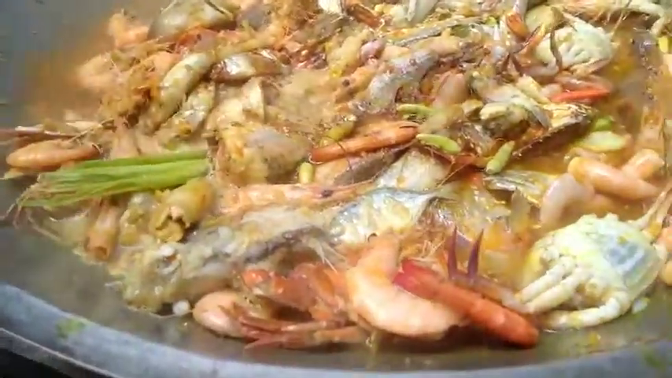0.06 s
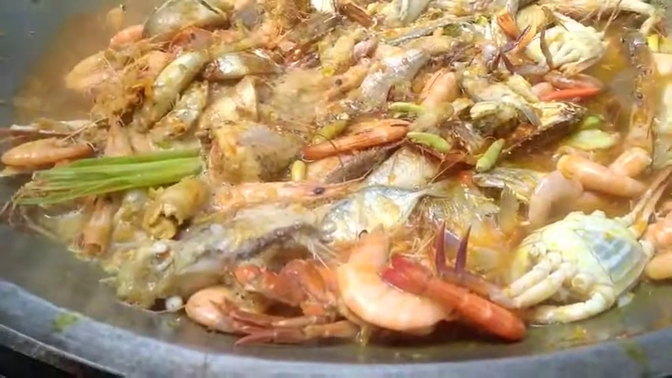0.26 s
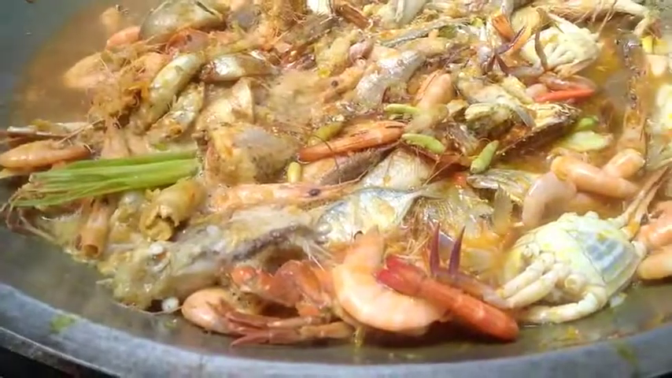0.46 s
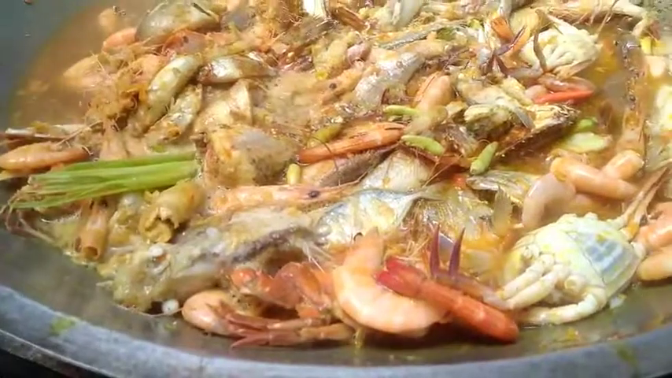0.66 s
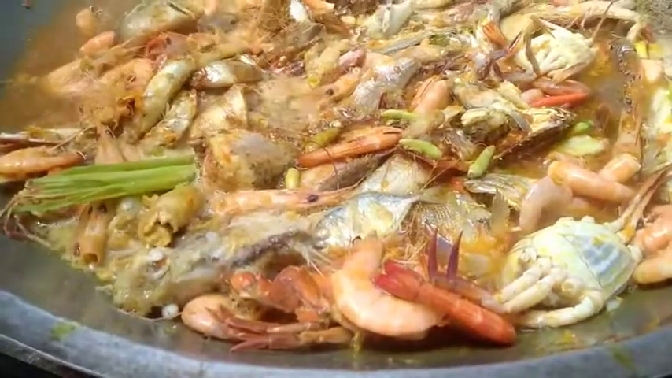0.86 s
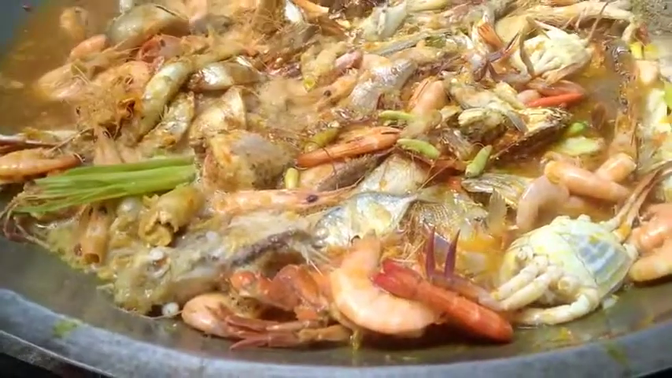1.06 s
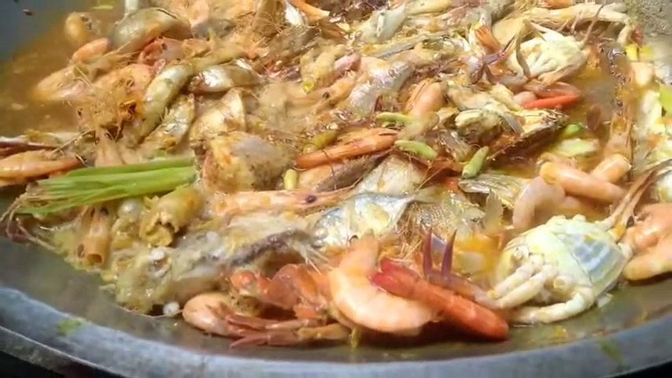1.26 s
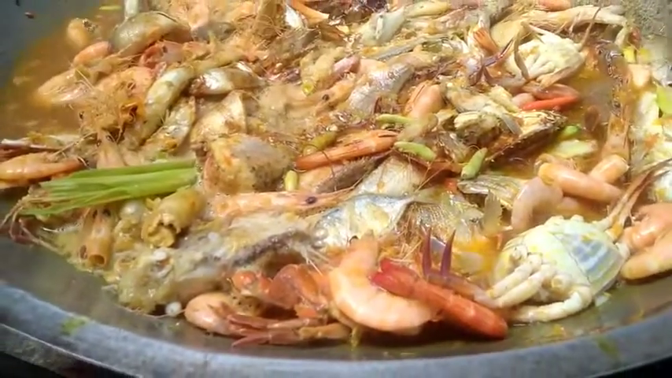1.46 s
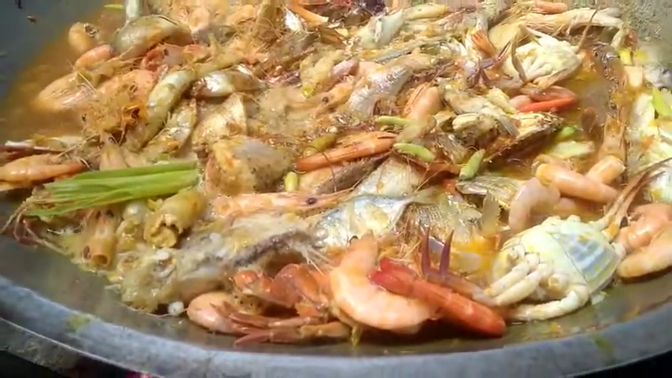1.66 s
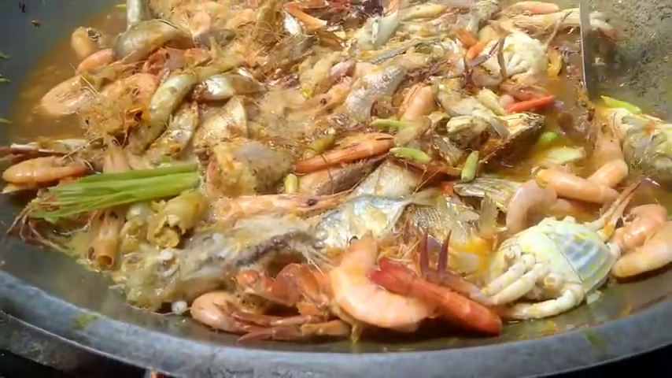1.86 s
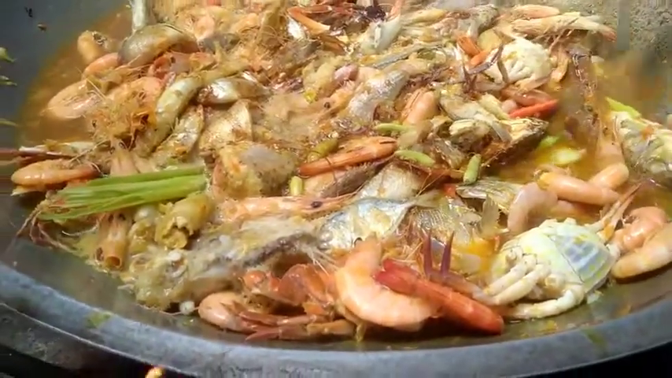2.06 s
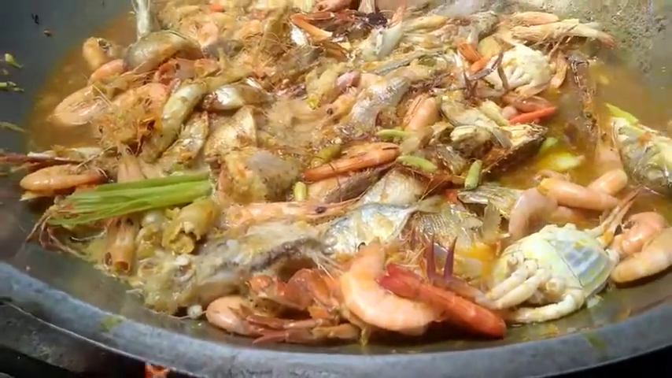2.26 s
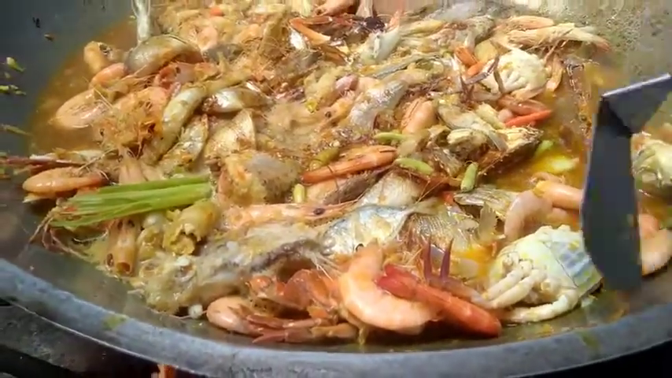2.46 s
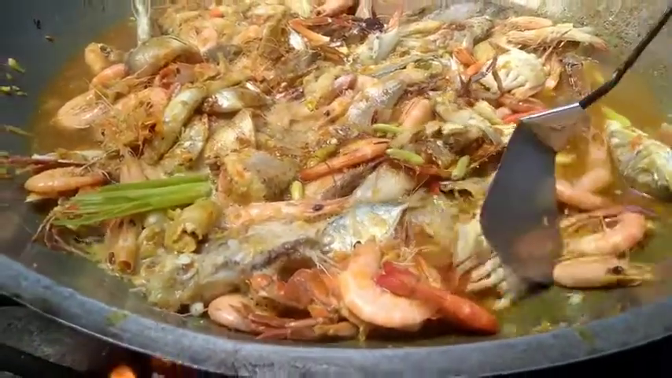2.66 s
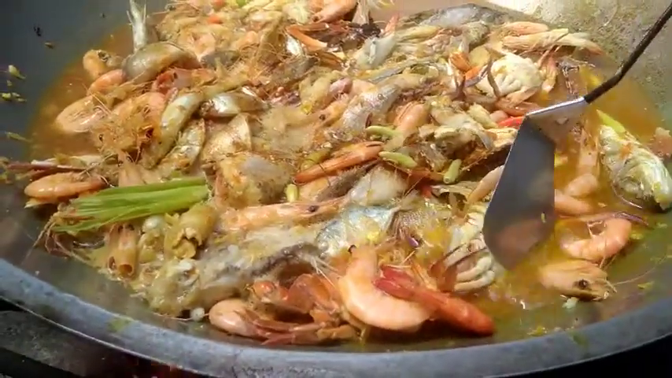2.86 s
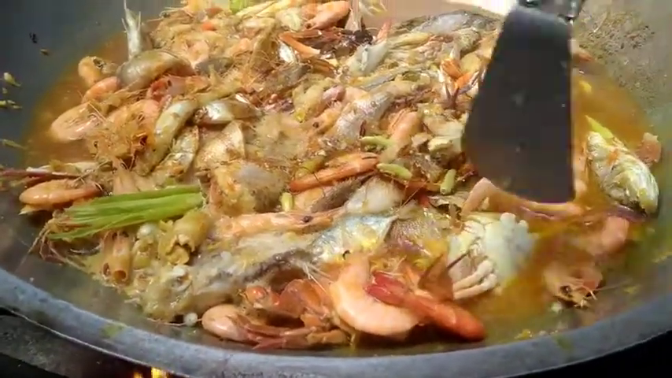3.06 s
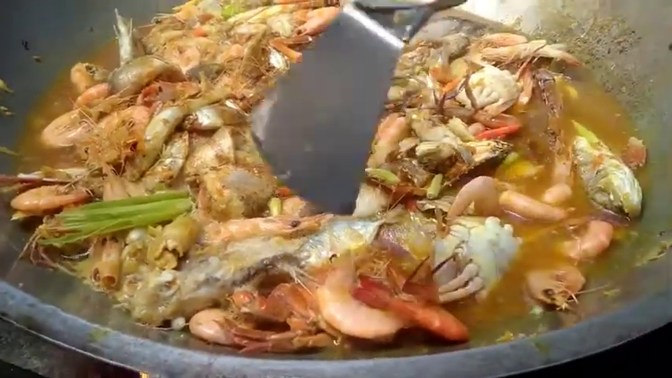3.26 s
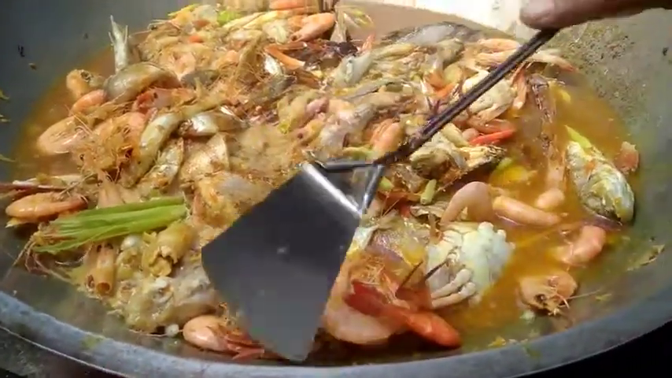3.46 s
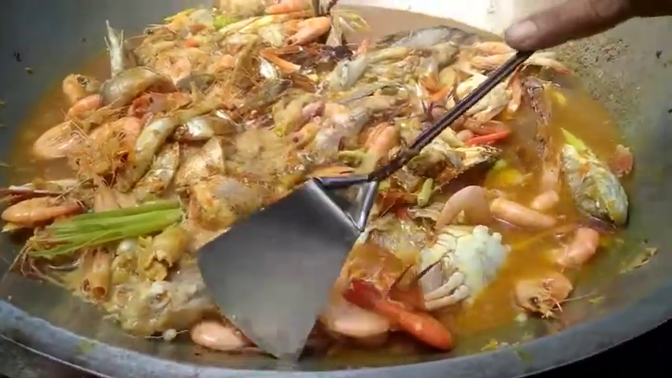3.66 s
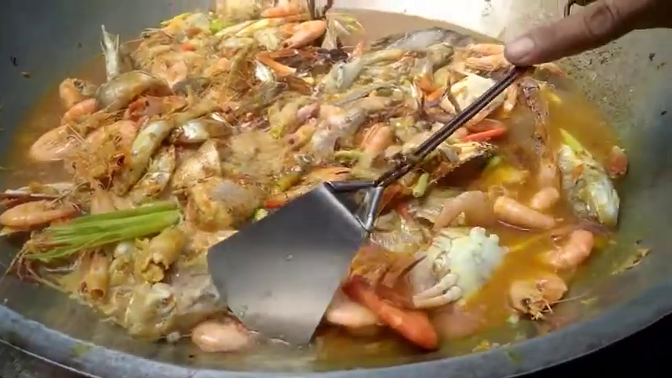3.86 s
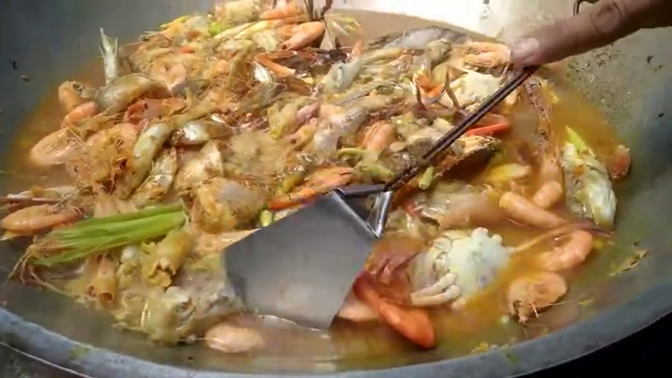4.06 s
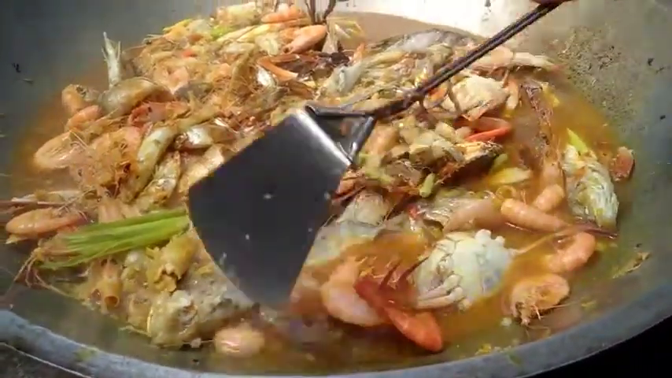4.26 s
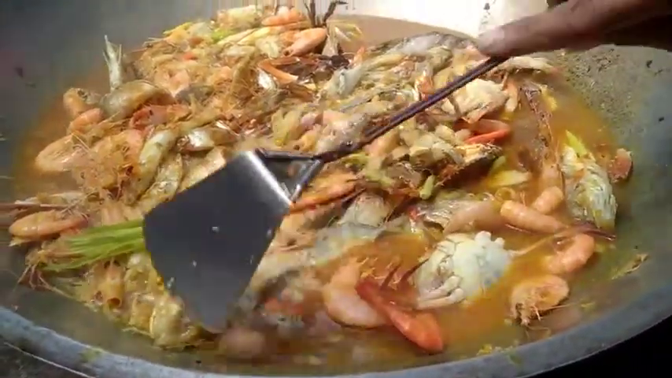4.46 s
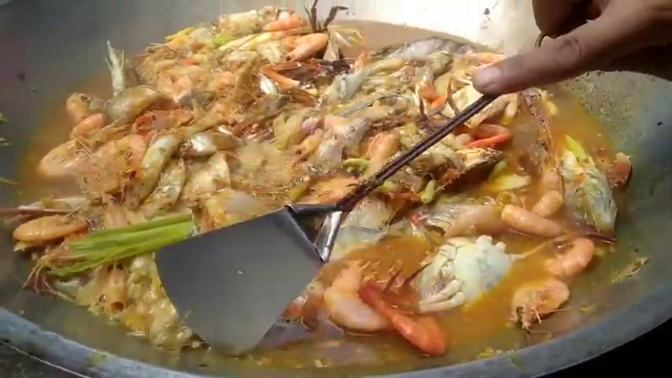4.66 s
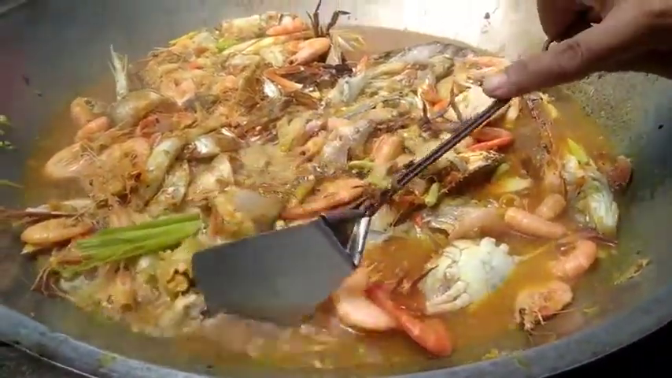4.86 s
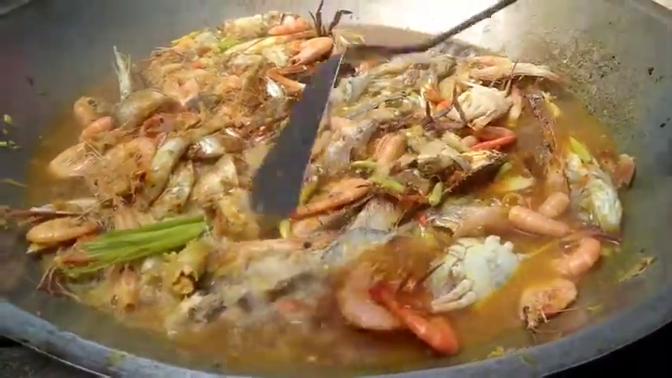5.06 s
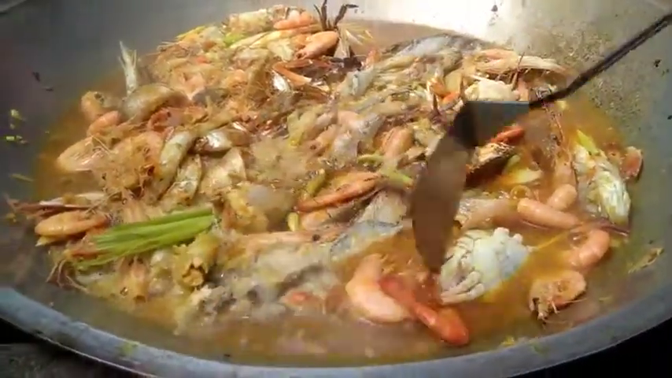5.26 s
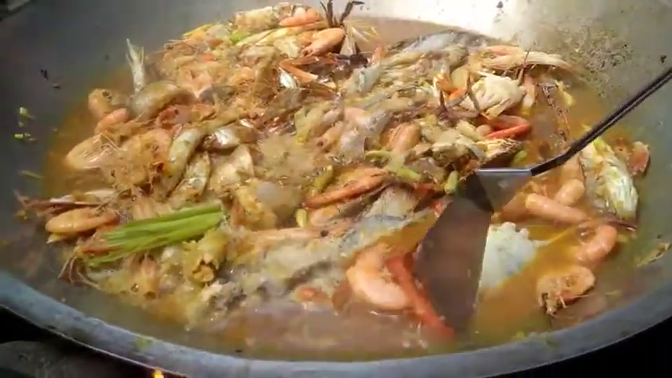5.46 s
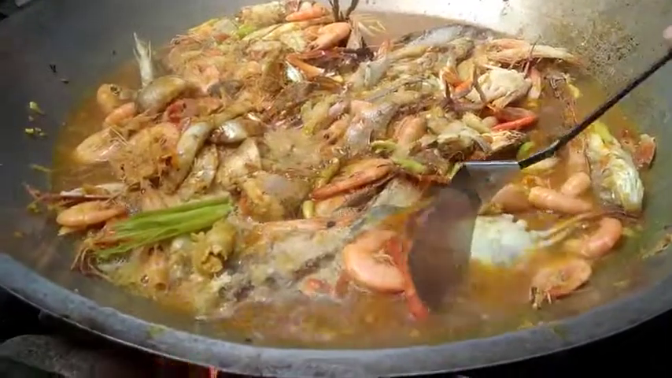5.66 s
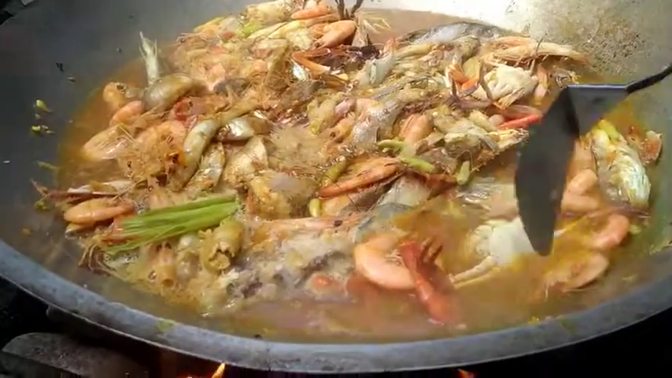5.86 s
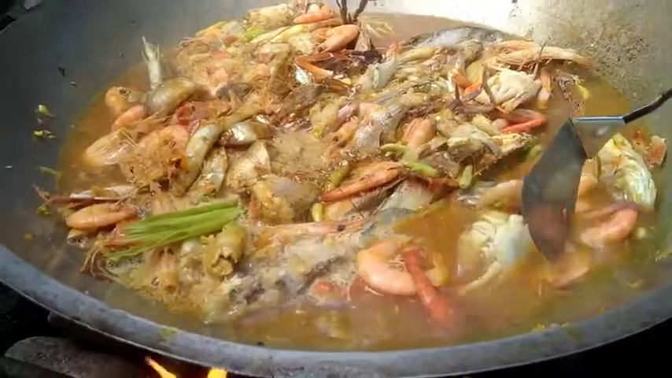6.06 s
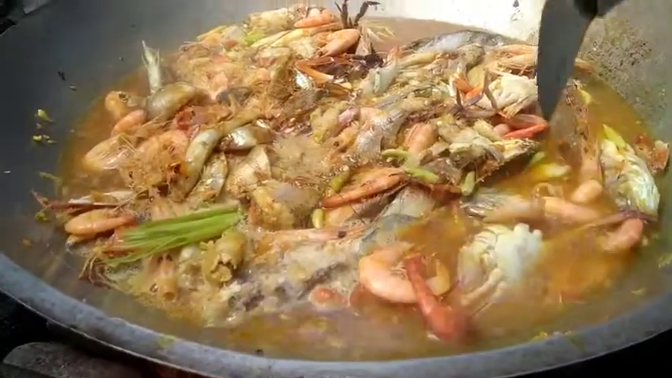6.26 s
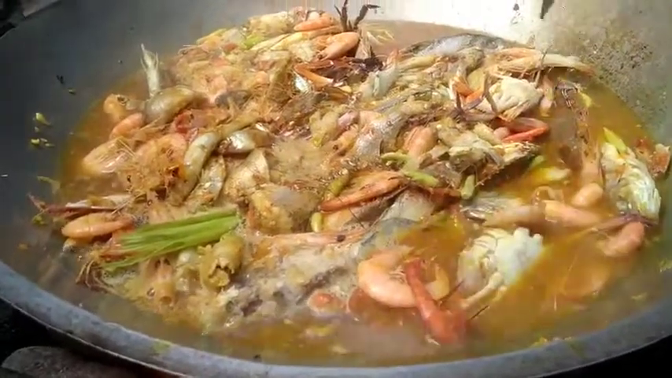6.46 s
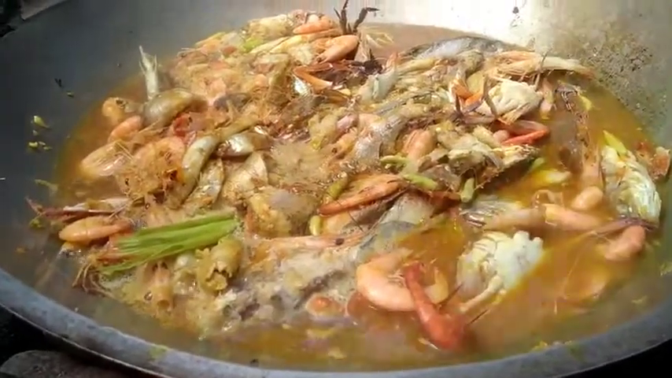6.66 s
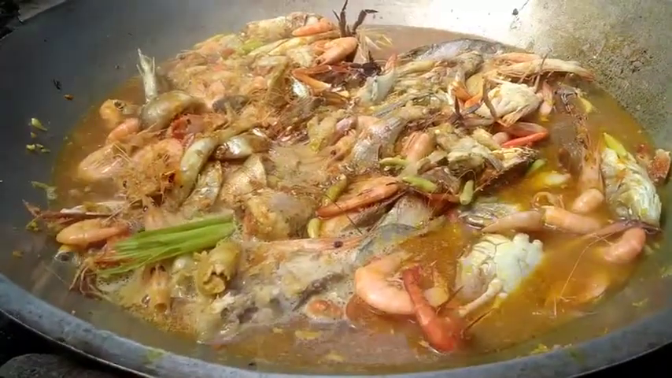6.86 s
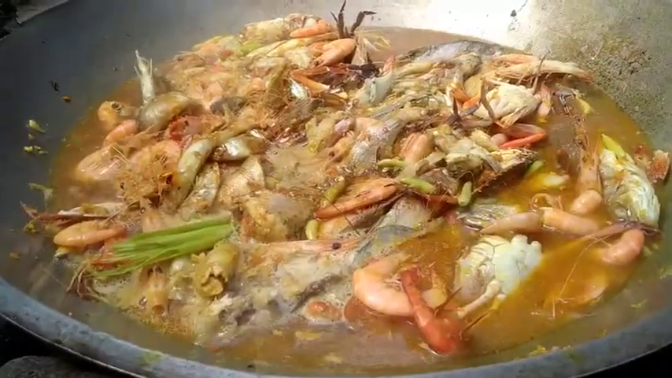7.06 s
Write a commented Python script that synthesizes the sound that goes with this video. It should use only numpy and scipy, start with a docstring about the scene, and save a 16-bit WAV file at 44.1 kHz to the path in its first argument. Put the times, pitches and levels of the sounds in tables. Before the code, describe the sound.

Close outdoor sound of a large, full steel wok over a wood fire. Soft flame rumble and faint bubbling run throughout, with occasional sharp snaps. A metal spatula knocks the rim about once a second, each clank bright but quickly damped. Between knocks it scrapes grittily along the wall and pushes broth, with wet gurgles, low booms and short steam hisses. The last second is mostly simmering.

```python
"""Seafood wok over a wood fire

A large steel wok simmers outdoors: noise-built flames rumble and hiss, random clicks bubble and spit.
A metal spatula knocks the wok (filtered clicks, short noise modes and ringing lines), scrapes along its
wall (streams of tiny slips) and pushes through the broth (bubble clusters, booms and bursts of steam).
The full wok damps each clank quickly but hums on in its lowest modes, as slowly wavering sines."""
import sys
import numpy as np
from scipy import signal
from scipy.fft import rfft, irfft, next_fast_len
from scipy.io import wavfile

SR = 44100
rng = np.random.default_rng(int(sys.argv[2]) if len(sys.argv) > 2 else 0)


def persist_wave(psi):
    """Save psi, clipped to +-1, as 16-bit WAV."""
    counts = np.round(np.clip(psi, -1, 1) * 32767).astype(np.int16)
    wavfile.write(sys.argv[1], SR, np.atleast_2d(counts).T)


N = 313551
TIME = np.arange(N) / SR
# All levels below are relative: each layer sets its own trim.

# rumble of the flames: start_s, level_db
FLAMES = [(0, -49.5), (1.3, -49), (3.3, -42.5), (3.85, -40), (4.3, -44), (6.1, -43), (6.55, -46.5),
          (7.11, -45)]
# vigour of the simmer: start_s, level_db
VIGOUR = [(0, -65.5), (0.5, -70.5), (1.3, -72.5), (3.4, -71.5), (4.5, -65), (5.3, -63.5), (6.1, -64.5),
          (7.11, -64.5)]
# spectra of the flames, the bubbling, the bright spitting and the scraped grit: pitch_hz, level_db
FIRE_SPECTRUM = [(40, -42.5), (52, -14.5), (66, -11), (85, 0.5), (130, 3.5), (200, 0.5), (270, -7),
                 (380, -18.5), (600, -23), (4000, -74)]
SIMMER_SPECTRUM = [(300, 7), (500, 1), (900, -3), (1400, -1), (2000, -3), (2700, -13), (3600, -14),
                   (7000, -62.5)]
SIZZLE_SPECTRUM = [(2500, -18), (4500, -4.5), (5900, -3), (7200, -1.5), (8700, 6.5), (11000, 1), (14000, 3),
                   (16000, 2.5)]
GRIT_SPECTRUM = [(1200, -72), (2500, 7), (3600, 7), (4300, -2.5), (5000, 0.5), (5900, -10), (7300, -2),
                 (8700, -2), (10500, -12), (16000, -16.5)]

# the wok's low hum, kept going by the stirring: start_s, level_db
HUM_LEVEL = [(0.0, -57), (0.34, -61.5), (1.9, -56), (2.06, -51.5), (2.89, -49.5), (3.13, -55), (3.7, -41.5),
             (4.73, -42), (5.31, -50), (5.8, -39), (6.63, -58.5), (7.11, -47)]
# the loaded wok's lowest modes: pitch_hz, level_db
HUM_MODES = [(116, 2), (158, -16), (194, -13.5), (234, -13)]

# loud snaps of fire and spitting broth: start_s, level_db, body_against_crack_db
SNAPS = [(0.084, -32.5, -33), (0.3047, -31.5, -4.5), (1.661, -42, -21), (4.272, -38, 4.5),
         (5.333, -39.5, 1.5), (6.3722, -32, 5), (6.7191, -40, 1)]

# broth pushed up onto the hot wall flashes to steam: start_s, level_db, swell_s
FIZZES = [(0.790, -56.5, 0.11), (1.9, -47.5, 0.03), (3.485, -42.5, 0.035), (3.719, -42, 0.032),
          (4.294, -40, 0.067), (4.760, -50, 0.038), (5.041, -51.5, 0.032), (5.344, -49, 0.016)]
FIZZ_T60_PER_SWELL = 3.6

# broth shoved by the blade: start_s, pitch_hz, level_db, swell_s
SLOSHES = [(0.174, 482, -42.5, 0.0057), (0.990, 620, -39.5, 0.0053), (1.873, 389, -34, 0.025),
           (2.416, 825, -46, 0.003), (2.939, 389, -39.5, 0.021), (4.430, 444, -45, 0.028),
           (5.126, 323, -30.5, 0.0069), (5.341, 398, -35.5, 0.0035), (6.915, 374, -44, 0.016)]
SLOSH_T60_S, SLOSH_T60_PER_SWELL = 0.07, 9   # slow shoves gurgle for longer
# smaller bubbles are weaker, the more so after a slow swell
SPLASH_DB_PER_OCTAVE, SPLASH_LOSS_DB_PER_S = -5.5, 250
# shoves that make the loaded wok boom: start_s, pitch_hz, level_db
BOOMS = [(1.9, 178.2, -33.5), (2.946, 144.4, -23), (3.451, 195.8, -31.5), (3.707, 118.6, -23.5),
         (4.79, 115.7, -30), (5.691, 136, -27), (5.72, 100, -31.5)]
BOOM_SWELL_S, BOOM_T60_S = 0.035, 0.38

# long drags down the wall, one curve each, as pressure on the edge: time_s, pressure_db
DRAGS = [
    [(0.65, -50), (0.812, -56), (0.82, -50), (0.894, -51), (0.908, -56), (1.014, -51), (1.034, -53.5),
     (1.094, -52.5), (1.14, -76)],
    [(1.79, -59), (1.804, -69), (1.812, -40), (1.838, -41.5), (1.932, -38.5), (2.022, -54), (2.048, -67),
     (2.06, -67)],
    [(2.62, -30.5), (2.64, -37), (2.67, -34), (2.682, -31), (2.718, -38.5), (2.746, -28), (2.784, -31),
     (2.806, -52), (2.86, -54.5)],
    [(3.68, -48), (3.724, -44.5), (3.758, -32.5), (3.838, -64), (3.914, -46), (3.988, -61), (4.17, -58),
     (4.25, -84)],
    [(4.742, -27), (4.752, -44), (4.866, -38.5), (4.886, -55), (4.908, -41.5), (4.942, -55), (5.038, -62),
     (5.06, -53), (5.1, -51)],
]
# where each drag begins: wall_hz, wall_against_blade_db, grit_db
DRAG_WALLS = [(1077, -1.5, -0.5), (1040, -5, 0), (1124, -2.5, 1.5), (880, -0.5, 1), (853, -7.5, 0)]
# deeper in the broth the wall sounds lower and outweighs the blade, and the broth smothers the grit
SINK_S, SINK_OCTAVES, SINK_WALL_DB, SINK_GRIT_DB = 0.25, 0.28, 6.5, -2.5
# quick swipes of the edge: peak_s, length_s, pressure_db, wall_hz, wall_against_blade_db
SWIPES = [(0.192, 0.097, -42, 1090, 0.5), (2.146, 0.056, -62, 1210, 12), (2.347, 0.13, -58, 1437, 0.5),
          (3.511, 0.094, -42.5, 1530, -1.5), (4.355, 0.17, -37.5, 1400, -1.5), (5.595, 0.25, -56.5, 830, 4),
          (6.26, 0.058, -66.5, 1142, 16)]
SWIPE_ATTACK = 0.42   # share of a swipe spent pressing in
# harder pressure throws more grit: level at a firm push, and its growth in dB per dB
FIRM_DB, GRIT_DB, GRIT_GROWTH = -39, -3, 0.073
BLADE_HZ = 1788   # where the blade rings when rubbed

# spatula on wok: start_s, clank_db, favoured_hz, lift_there_db, weight_behind_it_db,
# clank_t60_s (shorter in the treble), wok_ring_db, belly_hz, rebound_after_s (0 for none)
BLOWS = [(0.4699, -24, 2400, 2.5, -4.5, 0.093, -17, 400, 0.00072),
         (0.585, -26.5, 1150, 4, -7, 0.093, -20.5, 393, 0.0043),
         (1.7225, -26, 3500, 10, 1, 0.013, -25.5, 392, 0),
         (2.5852, -24.5, 1460, 3, 2.5, 0.11, -17, 378.6, 0.014),
         (3.6206, -24, 1780, 8, 2.5, 0.052, -19.5, 159, 0.0077),
         (4.6836, -22, 1760, 7, 4, 0.029, -24.5, 229.3, 0.006),
         (5.531, -24, 1940, -3.5, -5.5, 0.18, -25, 238.9, 0),
         (5.7017, -28, 1800, 14.5, -24, 0.014, -36, 134, 0.0137)]
# the rebound is weaker and leaves the wall free to ring
REBOUND_DB, REBOUND_RING_DB, REBOUND_T60_S = -8, -1, 0.16
# force of a contact: pitch_hz, level_db
CONTACT_SPECTRUM = [(400, -8.5), (1000, 1.5), (3500, -0.5), (9000, -8)]
# the clank's crowd of short modes: pitch_hz, level_db
CLANK_SPECTRUM = [(250, -8.5), (400, -3), (580, -12), (800, -4), (1150, -6), (1500, -2), (1900, 3.5),
                  (2300, -13), (2800, -5), (3500, -9), (4300, -8), (5900, -12.5), (7900, 1), (15500, -12)]
# modes of the wok wall: pitch_hz, level_db, t60_s (before the food damps it)
WOK_MODES = [(258, -10.5, 0.31), (387.7, -10, 0.25), (822, -2, 0.18), (942, 1.5, 0.037), (1102, -0.5, 0.15),
             (1316, -7, 0.24), (1364, -31, 0.18), (1465, -6.5, .14), (1673, -0.5, 0.1), (1828, -11.5, 0.12),
             (1988, -2, 0.091), (2100, -1, 0.11), (2238, 5.5, 0.069), (2238, -4, 0.17), (2540, -8.5, 0.14),
             (2966, -7, 0.12), (3176, -4, 0.051), (3474, -12, 0.085), (3620, -0.5, 0.024),
             (6800, -19.5, .04), (7400, -5.5, 0.042)]
WEIGHT_HZ = 750   # the weight behind a blow is heard below this
LIFT_REACH_OCTAVES = 0.92   # width of the favoured region
# a heavy blow also wakes a low belly mode, which falls 60 dB in a set number of cycles
BELLY_DB, BELLY_CYCLES = -12.5, 180
# and the blade's high note
PING_HZ, PING_DB, PING_T60_S = 8570, -23, 0.14

CUTOFF_HZ = 15700


def from_db(db):
    """Decibels to amplitude."""
    return 10 ** (np.asarray(db) / 20)


def rms_one(x):
    """Scale a sound to an rms of 1."""
    return x / np.sqrt(np.mean(x ** 2) + 1e-20)


def in_time(rows):
    """A level curve read at every sample."""
    s, db = np.transpose(rows)
    return np.interp(TIME, s, db)


def at_hz(points, hz):
    """A spectrum read on a log-frequency axis."""
    f, db = np.transpose(points)
    return np.interp(np.log(np.maximum(hz, 1)), np.log(f), db)


def add(out, s, sound):
    """Mix a sound in from time s on."""
    i = max(0, round(s * SR))
    out[i:i + len(sound)] += sound[:N - i]


def coloured(x, spectrum):
    """Give a steady excitation a spectrum that falls away below its first point; rms 1."""
    size = next_fast_len(len(x))
    hz = np.arange(size // 2 + 1) * SR / size
    bass_fall = np.minimum(hz / spectrum[0][0], 1) ** 2
    gain = from_db(at_hz(spectrum, hz)) * bass_fall
    return rms_one(irfft(rfft(x, size) * gain, size)[:len(x)])


def band(x, hz, octaves, order=2):
    """A broad resonance, its edges held below the top of the range."""
    edges = hz * 2. ** (np.array([-.5, .5]) * octaves)
    edges = np.minimum(edges, [SR * .4, SR * .45])
    return signal.sosfilt(signal.butter(order, edges, "band", fs=SR, output="sos"), x + 1e-18)


def resonance(x, hz, octaves):
    """A rounded peak with steep skirts; rms 1."""
    peak = band(x, hz, octaves, order=1)
    return rms_one(band(peak, hz, 2 * octaves, order=1))


def drift(rate, size):
    """Slow random wander through knots of spread 1, at a rate in knots per second."""
    knots = rng.standard_normal(int(size / SR * rate) + 2)
    return np.interp(np.arange(size) / SR * rate, np.arange(len(knots)), knots)


def fade(t, t60):
    """Free decay, down 60 dB after t60 seconds."""
    return np.exp(-np.log(1000) * t / t60)


def swell(t, rise, t60):
    """A smooth rise, then free decay."""
    return np.sin(np.pi / 2 * np.minimum(t / rise, 1)) ** 2 * fade(np.maximum(t - rise, 0), t60)


def grains(size, per_s, spread_db):
    """Random clicks of uneven size and sign."""
    sizes = from_db(spread_db * np.minimum(rng.exponential(1, size), 4))
    return (rng.random(size) < per_s / SR) * sizes * rng.choice([-1, 1], size)


def yard(x, wet_db=-20, t60=0.18):
    """Weak scatter from the ground and the walls near by: a short swell of decaying noise."""
    t = TIME[:SR // 2]
    scatter = band(rng.standard_normal(len(t)), 1540, 6.7, order=1) * swell(t, 0.013, t60)
    scatter = scatter / np.linalg.norm(scatter)
    return x + from_db(wet_db) * signal.fftconvolve(x, scatter)[:N]


def hearth(fire_db=1, simmer_db=9, sizzle_db=-2, crackle_db=-2, simmer_follows=0.89):
    """Flames rumble on their own curve while the broth bubbles, hisses and spits with its vigour."""
    rumble_db = in_time(FLAMES) + fire_db + drift(9.4, N)
    flames = from_db(rumble_db) * coloured(rng.standard_normal(N), FIRE_SPECTRUM)
    vigour = in_time(VIGOUR)
    # the bubbling follows the vigour a little less than fully
    bubbling = vigour.mean() + simmer_follows * (vigour - vigour.mean())
    bubbling_db = bubbling + simmer_db + 4.66 * drift(25, N)
    bubbles = from_db(bubbling_db) * coloured(grains(N, per_s=5000, spread_db=3.0), SIMMER_SPECTRUM)
    hiss = from_db(sizzle_db) * coloured(rng.standard_normal(N), SIZZLE_SPECTRUM)
    # tiny spits ring at ten different pitches
    pops = np.zeros(N)
    for hz in np.geomspace(3000, 15000, 10):
        pops += band(grains(N, per_s=69, spread_db=2.5), hz, 0.65, order=1) / np.sqrt(hz)
    spits = from_db(crackle_db) * coloured(pops, SIZZLE_SPECTRUM)
    return flames + bubbles + from_db(vigour) * (hiss + spits)


def hum(waver_db=3.0, waver_hz=2.517, waver_per_s=11):
    """Flames and stirring keep the low modes sounding, each wavering a little in level and pitch."""
    lines = np.zeros(N)
    for hz, db in HUM_MODES:
        phase = 2 * np.pi * np.cumsum(hz + waver_hz * drift(waver_per_s, N)) / SR
        level = from_db(db + waver_db * drift(waver_per_s, N))
        lines += np.sqrt(2) * np.sin(phase) * level
    return from_db(in_time(HUM_LEVEL)) * lines


def snaps(crack_t60=0.038, body_t60=0.037):
    """A bright crack with a short woody body, both bursts of decaying noise."""
    out, t = np.zeros(N), TIME[:SR // 8]
    for s, db, body_db in SNAPS:
        crack = coloured(rng.standard_normal(len(t)), SIZZLE_SPECTRUM) * fade(t, crack_t60)
        body = rms_one(band(rng.standard_normal(len(t)), 1090, 2.26)) * fade(t, body_t60)
        add(out, s, 0.42 * from_db(db) * (crack + from_db(body_db) * body))
    return out


def fizzes(crackle_per_s=6000):
    """Broth flashing to steam: bursts of tiny pops that swell and die away."""
    out, t = np.zeros(N), TIME[:SR]
    for s, db, rise in FIZZES:
        pops = coloured(grains(len(t), crackle_per_s, spread_db=3), SIZZLE_SPECTRUM)
        add(out, s, from_db(db) * pops * swell(t, rise, FIZZ_T60_PER_SWELL * rise))
    return out


def broth(octave_seconds=0.08):
    """Pushed food lets out clusters of bubbles, narrower the longer they ring; the heavy wok booms."""
    out, t = np.zeros(N), TIME[:SR]
    for s, hz, db, rise in SLOSHES:
        t60 = SLOSH_T60_S + SLOSH_T60_PER_SWELL * rise
        for octave in range(3):
            bubbles = grains(len(t), per_s=1100, spread_db=3.0)
            cluster = resonance(bubbles, hz * 2 ** octave, octave_seconds / t60)
            smaller_db = octave * (SPLASH_DB_PER_OCTAVE - SPLASH_LOSS_DB_PER_S * rise)
            add(out, s, from_db(db + smaller_db) * cluster * swell(t, rise, t60))
    for s, hz, db in BOOMS:
        add(out, s, from_db(db) * np.sin(2 * np.pi * hz * t) * swell(t, BOOM_SWELL_S, BOOM_T60_S))
    return out


def wok_ring(force, favoured_hz, focus_db=7, reach_octaves=0.21, damping=1.13):
    """The wall's modes; each contact point favours one region of them, and the food damps them all."""
    out = np.zeros(len(force))
    for hz, db, t60 in WOK_MODES:
        r, w = fade(1 / SR, t60 / damping), 2 * np.pi * hz / SR
        nearness = np.exp(-(np.log2(hz / favoured_hz) / reach_octaves) ** 2)
        gain = from_db(db + focus_db * (nearness - 1)) * rng.choice([-1, 1])
        # two-pole resonator: a decaying sine for each push
        out += gain * signal.lfilter([0, np.sin(w)], [1, -2 * r * np.cos(w), r * r], force + 1e-18)
    return out


def plate(force, t60=0.032, direct_db=6):
    """Thin steel rings briefly in a crowd of modes, which streaks whatever drives it; rms 1."""
    t = TIME[:SR // 8]
    crowd = rng.standard_normal(len(t)) * fade(t, t60)
    streaks = rms_one(signal.fftconvolve(force, crowd)[:len(force)])
    return rms_one(streaks + from_db(direct_db) * rms_one(force))


def rub(pressure_db, depth, wall_hz, wall_db, grit_db, wall_octaves=0.37, blade_octaves=0.41,
        judder_db=3.0, wander_db=4.0, ring_db=-8):
    """The edge slips in tiny jerks over the wall; they sound wall and blade and spray a gritty hiss."""
    size = len(pressure_db)
    judder = from_db(judder_db * drift(197.1, size))
    slips = plate(grains(size, per_s=4000, spread_db=2.5)) * judder
    shallow = resonance(slips, wall_hz, wall_octaves)
    deep = resonance(slips, wall_hz / 2 ** SINK_OCTAVES, wall_octaves)
    wall_level = from_db(wall_db + SINK_WALL_DB * depth + wander_db * drift(29.4, size))
    wall = wall_level * (np.sqrt(1 - depth) * shallow + np.sqrt(depth) * deep)
    blade = resonance(slips, BLADE_HZ, blade_octaves)
    grit_growth_db = GRIT_GROWTH * (pressure_db - FIRM_DB)
    grit_level = from_db(GRIT_DB + grit_db + SINK_GRIT_DB * depth + grit_growth_db)
    grit = grit_level * coloured(slips, GRIT_SPECTRUM)
    sound = from_db(pressure_db) * (wall + blade + grit)
    ring = rms_one(wok_ring(sound, BLADE_HZ))
    return sound + from_db(ring_db) * np.std(sound) * ring


def scrapes(drag_db=-1.5, lift_db_per_s=400, sharpness=1.98):
    """Long drags sink into the broth and lift off; quick swipes swell and fade high on the wall."""
    out, t = np.zeros(N), TIME[:SR * 3 // 4]
    for curve, (wall_hz, wall_db, grit_db) in zip(DRAGS, DRAG_WALLS):
        s, db = np.transpose(curve)
        now = s[0] + t
        lift_off_db = lift_db_per_s * np.maximum(now - s[-1], 0)
        pressure_db = drag_db + np.interp(now, s, db) - lift_off_db
        depth = np.minimum(t / SINK_S, 1)
        add(out, s[0], rub(pressure_db, depth, wall_hz, wall_db, grit_db))
    for peak, length, db, wall_hz, wall_db in SWIPES:
        attack = SWIPE_ATTACK * length
        arch = np.sin(np.pi / 2 * np.interp(t, [0, attack, length], [0, 1, 0])) ** sharpness
        pressure_db = db + 20 * np.log10(arch + 1e-9)
        add(out, peak - attack, rub(pressure_db, 0, wall_hz, wall_db, 0))
    return out


def clank(db, favoured_hz, lift_db, weight_db, t60, treble_damping=0.12, spread_s=0.00099, count=22):
    """A crowd of short modes, coloured by the contact point and by the weight behind the blow."""
    t = TIME[:SR // 2]
    out = np.zeros(len(t))
    centres = np.geomspace(260, 15000, count)
    step_octaves = np.log2(centres[1] / centres[0])
    for hz in centres:
        nearness = np.exp(-(np.log2(hz / favoured_hz) / LIFT_REACH_OCTAVES) ** 2)
        bass = 1 / (1 + (hz / WEIGHT_HZ) ** 4)
        steel_db = at_hz(CONTACT_SPECTRUM, hz) + at_hz(CLANK_SPECTRUM, hz)
        level_db = db + steel_db + nearness * lift_db + bass * weight_db
        # bending waves need a moment to spread over the wall; the treble arrives and dies first
        treble = min(1, BLADE_HZ / hz)
        decay = swell(t, spread_s * treble, t60 * treble ** treble_damping)
        modes = band(rng.standard_normal(len(t)) * decay, hz, step_octaves)
        # every band gets the strength of its decay, at half amplitude
        out += .5 * from_db(level_db) * modes * np.std(decay) / np.std(modes)
    return out


def blows(knock_hz=1300, knock_octaves=1.3, knock_db=-2.0, knock_follows=0.58, ring_db=-2):
    """Each contact: a knock, a clank of short modes, then the wok's longer lines; some rebound once."""
    out, t = np.zeros(N), TIME[:SR // 2]
    click = signal.unit_impulse(len(t))
    knock = band(click, knock_hz, knock_octaves, order=3)
    knock = knock / np.abs(knock).max()
    ping = from_db(PING_DB) * np.sin(2 * np.pi * PING_HZ * t) * fade(t, PING_T60_S)
    for s, db, favoured_hz, lift_db, weight_db, t60, wok_db, belly_hz, rebound_s in BLOWS:
        contacts = [(s, db, wok_db, t60)]
        if rebound_s > 0:
            contacts.append((s + rebound_s, db + REBOUND_DB, wok_db + REBOUND_RING_DB, REBOUND_T60_S))
        for when, clank_db, wall_db, clank_t60 in contacts:
            add(out, when, from_db(knock_db + knock_follows * wall_db) * knock)
            add(out, when, clank(clank_db, favoured_hz, lift_db, weight_db, clank_t60))
            add(out, when, from_db(wall_db + ring_db) * wok_ring(click, favoured_hz))
        belly_swell = swell(t, 0.0051, BELLY_CYCLES / belly_hz)
        belly = from_db(BELLY_DB) * np.sin(2 * np.pi * belly_hz * t) * belly_swell
        add(out, s, from_db(db + weight_db) * (belly + ping))
    return out


def scene():
    """Spatula, broth and snaps scatter in the yard, over the steady hearth and hum."""
    close = blows() + scrapes() + broth() + fizzes() + snaps()
    return (yard(close) + hearth() + hum())[None]


def record(dry, low_cut_hz=52):
    """The small microphone loses the deep bass; the top is cut steeply."""
    thin = signal.sosfilt(signal.butter(4, low_cut_hz, "high", fs=SR, output="sos"), dry)
    return signal.sosfilt(signal.ellip(10, .2, 70, CUTOFF_HZ, fs=SR, output="sos"), thin)


dry = scene()
out = record(dry)
persist_wave(out)
```